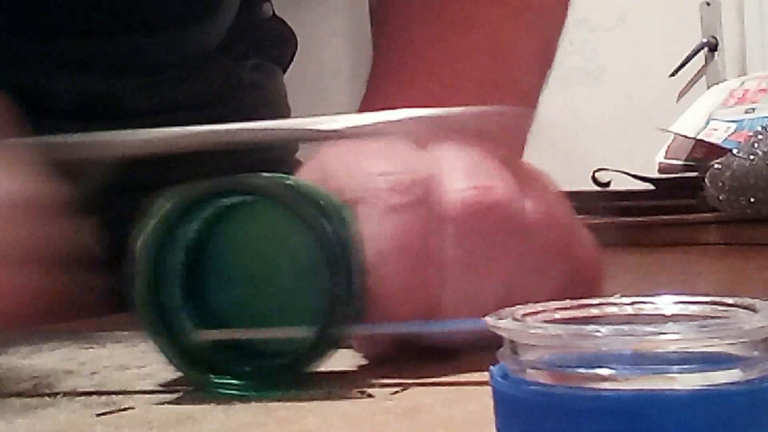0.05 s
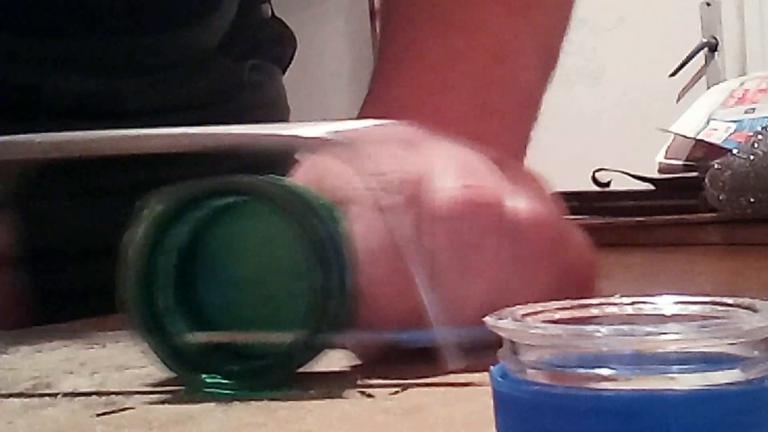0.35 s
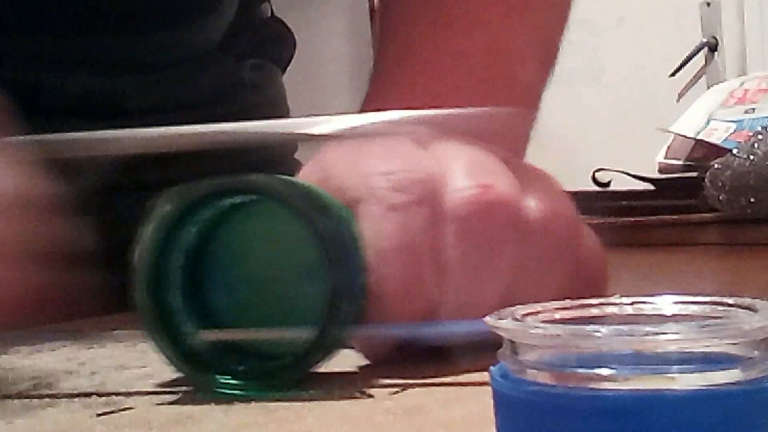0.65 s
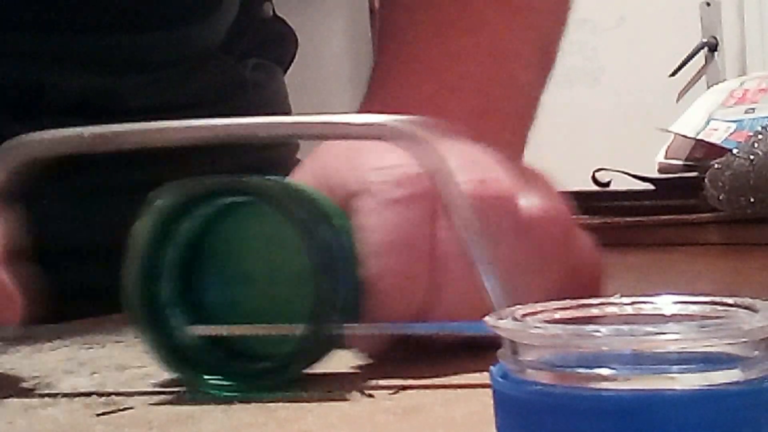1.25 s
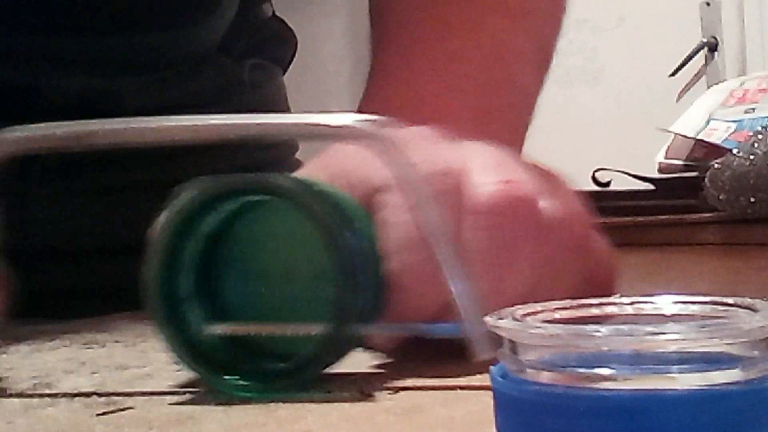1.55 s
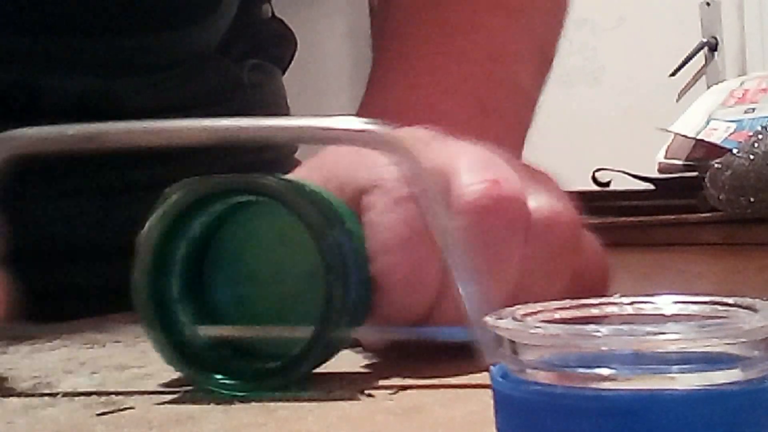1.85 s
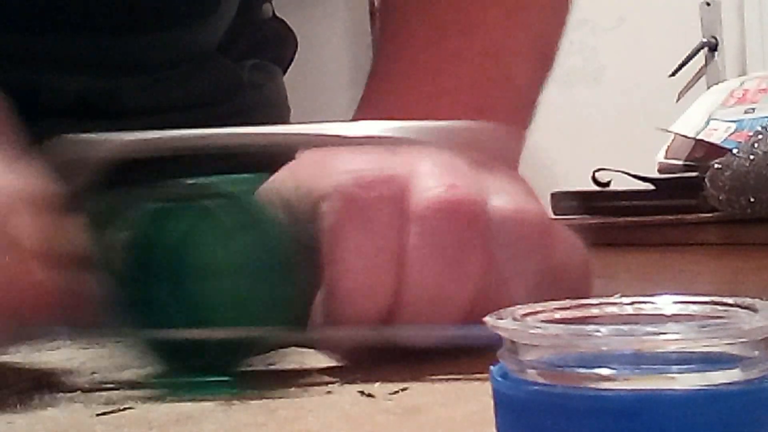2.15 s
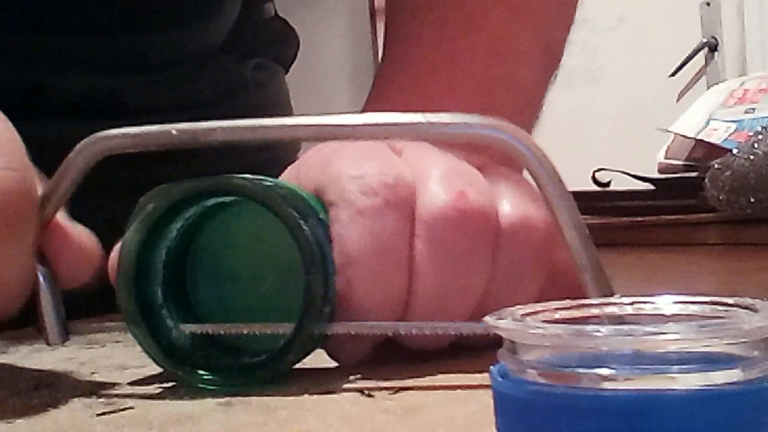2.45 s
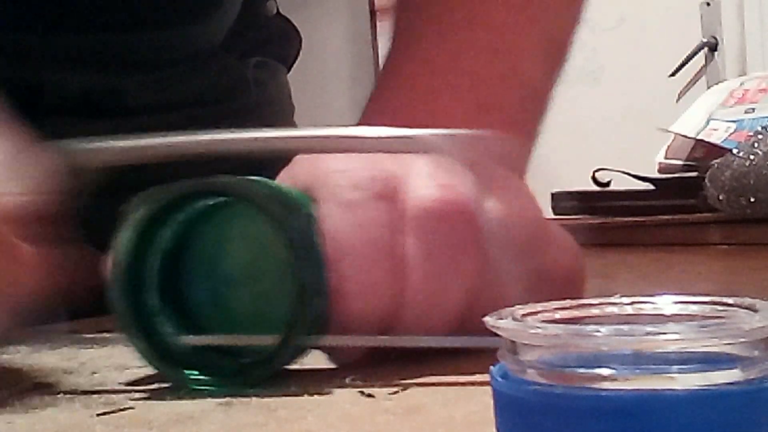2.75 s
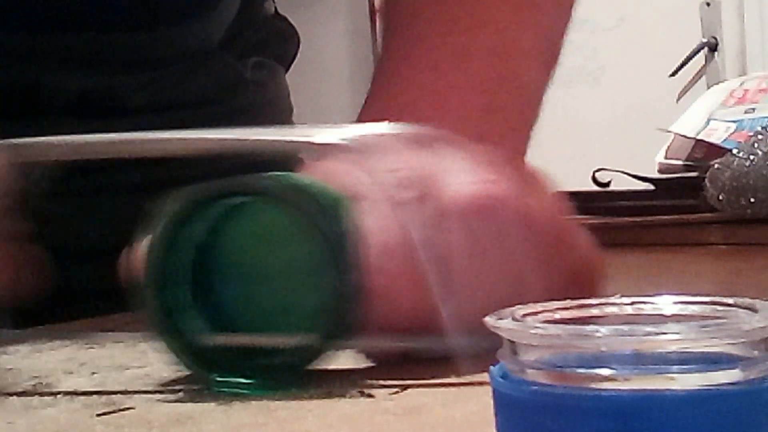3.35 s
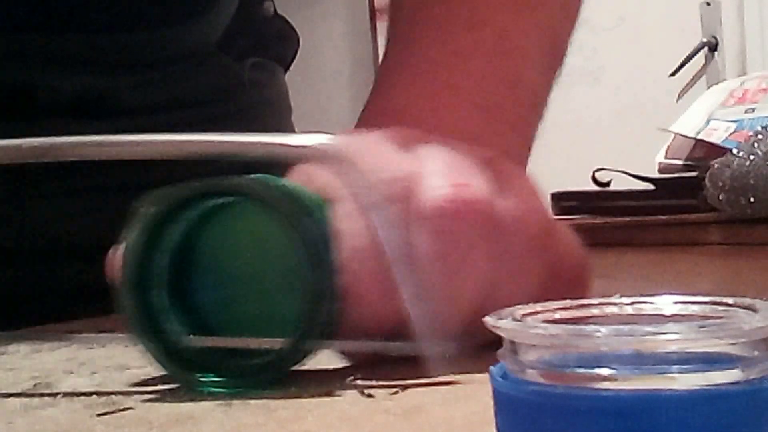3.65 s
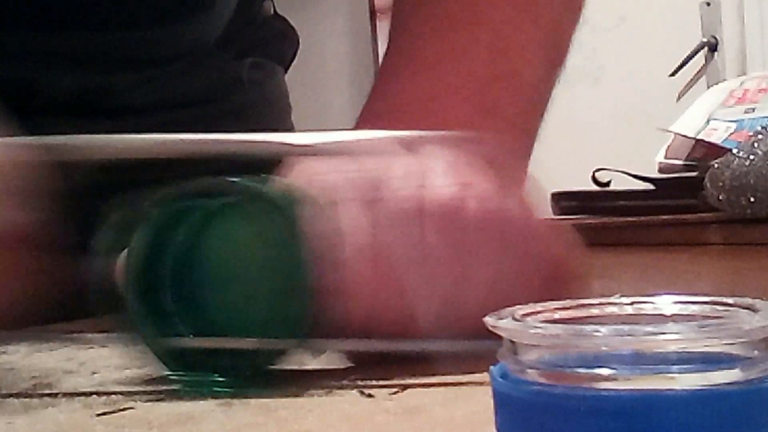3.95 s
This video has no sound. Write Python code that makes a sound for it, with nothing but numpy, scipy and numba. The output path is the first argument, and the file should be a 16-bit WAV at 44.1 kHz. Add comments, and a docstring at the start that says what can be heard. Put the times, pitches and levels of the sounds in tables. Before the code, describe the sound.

Close by in a small room, a hand saw rasps rhythmically through a hollow plastic bottle on a work surface. The blade chatters now and then and the bottle knocks lightly; after a short pause, the sawing resumes.

```python
"""Quick rasping strokes, about three cycles a second, with one pause: a junior hacksaw on a plastic bottle.
Teeth tick across the cut, ringing the thin blade and the hollow bottle and shaking the bench under it.
Now and then the blade binds and chatters, or the bottle knocks on the bench.
A small room adds a short tail and faint steady noise."""
import sys
import numpy as np
from scipy import signal
from scipy.fft import rfft, irfft
from scipy.io import wavfile
from scipy.ndimage import uniform_filter1d
from numba import njit

SR = 44100
rng = np.random.default_rng(int(sys.argv[2]) if len(sys.argv) > 2 else 0)


def log_audio(samples):
    """Write samples as a 16-bit WAV file to the path given in sys.argv[1]."""
    # one column per channel
    frames = np.atleast_2d(samples).T
    # limit to full scale, then quantise
    limited = np.clip(frames, -1, 1)
    pcm = np.round(limited * 32767).astype(np.int16)
    wavfile.write(sys.argv[1], SR, pcm)


N = 176400
TIME_S = np.arange(N) / SR

# Saw strokes. Each row: start and end in seconds, direction (+1 push, -1 pull),
# force on blade, wall, hollow and bench in relative dB, swell over the stroke in dB.
STROKES = [(-.08, 0.027, 1, -54.5, -53, -50, -49, 2), (0.032, 0.138, -1, -47, -44.5, -38.5, -39.5, -5),
           (0.182, 0.281, 1, -43, -44, -41.5, -39.5, -4.5), (0.299, .405, -1, -50, -45.5, -40.5, -41, 7),
           (0.455, 0.55, 1, -44, -45.5, -41, -48, -4), (0.575, 0.676, -1, -50.5, -44.5, -38.5, -40.5, -2.5),
           (0.719, 0.817, 1, -44.5, -46, -42.5, -44, -1), (.847, 0.949, -1, -47, -44.5, -39, -39, -3),
           (1.027, 1.099, 1, -44, -43, -41.5, -37.5, -7), (1.125, 1.220, -1, -52, -45.5, -36.5, -40, -12),
           (1.31, 1.391, 1, -43, -38, -39, -39, 1.5), (1.433, 1.546, -1, -52, -47.5, -40.5, -41.5, -8.5),
           (1.607, 1.69, 1, -41, -39.5, -38, -36.5, 1), (1.734, 1.836, -1, -47, -42.5, -37.5, -36, -6.5),
           (1.909, 1.993, 1, -43.5, -40, -38, -42, -0.5), (2.024, 2.119, -1, -50.5, -45, -37, -38.5, -3.5),
           (2.224, 2.28, 1, -58, -48.5, -40, -36, -13), (2.746, 2.830, 1, -58, -56, -53, -52.5, 15),
           (2.922, 2.985, -1, -52.5, -42.5, -33, -37, 0.5),
           (3.117, 3.193, 1, -46.5, -42.5, -35.5, -35.5, -17),
           (3.26, 3.344, -1, -49, -43, -34.5, -35.5, -1.5), (3.418, 3.502, 1, -42, -41.5, -45, -36, -2),
           (3.540, 3.625, -1, -53, -41, -34, -36.5, 8), (3.694, 3.792, 1, -42, -38, -38, -36.5, -14.5),
           (3.823, 3.906, -1, -47, -40.5, -32, -34.5, -1), (3.98, 4.067, 1, -53, -40, -29, -32, -4)]
# The blade binds. Each row: middle and length in seconds, slip rate in Hz,
# chatter, rasp and crunch in relative dB.
SNAGS = [(0.387, .024, 461, -29.5, -67, -43), (0.884, 0.022, 468, -34, -50, -52),
         (1.06, 0.03, 518.3, -30.5, -41, -57), (1.346, 0.034, 490, -33.5, -39.5, -31.5),
         (1.377, .016, 444, -27, -60, -37), (1.651, .036, 518.7, -26, -50, -51),
         (1.944, 0.023, 536, -31.5, -34, -41), (1.963, .031, 446, -30.5, -42, -41),
         (2.094, 0.062, 261.2, -30.5, -68, -51), (2.270, 0.01637, 248, -27.5, -90, -44),
         (2.965, .036, 249, -23, -58, -53), (3.141, 0.027, 479.6, -28.5, -40.5, -59),
         (3.294, .05, 278.5, -27, -73, -80), (3.457, .015, 507.5, -24, -57, -45),
         (3.582, .055, 430, -27.5, -51, -46), (3.601, .02, 467.8, -37, -62, -37),
         (3.725, 0.028, 525, -31.5, -68, -32.5), (3.86, .029, 309.3, -23.5, -46.5, -38.5),
         (3.883, .026, 292.4, -23, -52.5, -43.5), (3.984, 0.017, 280.6, -24.5, -45.5, -34)]
# Knocks and tooth catches. Each row: start and decay in seconds,
# force on blade, wall, hollow and bench in relative dB.
KNOCKS = [(1.132, 0.0055, -42.5, -48.5, -36, -30), (1.335, 0.0057, -46, -30.5, -35.5, -56),
          (1.440, 0.0047, -54, -54, -38, -29), (1.935, 0.0061, -32, -33.5, -30.5, -55),
          (2.195, 0.0047, -57.5, -60, -41, -38), (2.229, 0.0019, -52, -36, -29.5, -37),
          (2.233, 0.0068, -42, -42, -47, -38), (2.263, 0.0053, -70, -54, -37, -40),
          (2.545, .012, -92, -86, -64.5, -49.5), (2.595, 0.018, -68, -58.5, -45.5, -43),
          (2.873, 0.0042, -84, -71, -66, -38.5), (3.125, 0.0058, -31.5, -38, -49, -48),
          (3.429, 0.0094, -59, -40.5, -32, -55), (3.978, 0.0072, -46, -42, -29, -38)]
# Scuffs in the cut. Each row: middle and length in seconds,
# force on blade, wall, hollow and whine in relative dB.
SCUFFS = [(0.721, 0.011, -66, -58, -47, -53), (1.008, 0.026, -58, -53, -45, -61),
          (1.02, .018, -41.5, -45, -41, -64), (1.214, .014, -56.5, -53, -48, -65),
          (1.303, 0.012, -68, -60, -47, -67), (2.122, 0.011, -60.5, -56, -54, -76),
          (2.811, .016, -69, -52.5, -47.5, -67), (2.916, 0.019, -68, -61, -56, -54),
          (3.085, 0.048, -56, -51, -48, -58.5), (3.105, 0.016, -50.5, -65, -44.5, -67),
          (3.247, .026, -61, -68, -46.5, -55), (3.69, 0.026, -71, -52, -56, -60),
          (3.968, 0.019, -54, -48, -43, -68)]
# Resonances. Each row: centre and width in Hz, gain on the push and on the pull in relative dB.
BLADE_MODES = [(2888, 127, 4.5, 9), (3130, 67, -2, -15.5), (3286, 160, -5, -29), (3795, 660, -8.5, -2.5),
               (4320, 510, -5.5, -0.5), (5330, 385, -1.5, 1.5), (5874, 310, -1.5, 0.5), (6100, 130, 1, 3.5),
               (6440, 590, -9, -7), (10080, 805, .5, 3.5), (10840, 580, 1, 4), (11500, 740, -7, -2),
               (14800, 265, 4, 4.5)]
WALL_MODES = [(840, 63, 1, -4), (920, 293, -4, -5), (1197, 292, -1.5, -1), (1596, 150, -0.5, 2),
              (1862, 246, -10, -7)]
CRUNCH_MODES = [(898, 110, -9.5, 0), (1248, 240, -12, -11.5)]  # bottle wall, as the plastic crunches
WHINE_MODES = [(1567, 116, -7.5, 5.5)]  # bottle wall, as the blade turns
HOLLOW_MODES = [(421.7, 55, 3.5, 1.5), (549, 93.4, 0.5, -1.5), (732, 98, -5.5, -6)]
BENCH_MODES = [(61, 145, -14.5, -11.5), (114, 79.4, -3, -3), (183.6, 25.3, -7, -4), (239, 37.7, -5.5, -1),
               (322.5, 23.3, -3, -5)]
# Blade tone. Each row: time in seconds, lower ring over upper sizzle in dB.
RING_OVER_SIZZLE = [(0, 2), (.7, -4), (1.4, -0.5), (2.1, -0.5), (2.8, 9.5), (3.2, 4), (3.6, 5.5), (4, 2)]
# Force grows as a power of speed. One exponent each for blade, wall, hollow and bench.
FORCE_EXPONENTS = [0.96, 0.89, 0.63, 0.1]
# Room tail. Each row: low and high edge in Hz, T60 in seconds, level in dB.
ROOM_BANDS = [(60.5, 150, 0.31, -9.5), (202, 284, 0.39, -9.5), (284, 820, 0.28, -8.5),
              (780, 1920, 0.35, -14.5), (2010, 4800, 0.32, -12), (3892, 11400, .17, -13),
              (11400, 13000, 0.088, -19.5)]
# Still air of the room. Each row: frequency in Hz, spectral density in relative dB.
AIR_SPECTRUM = [(25, -29.5), (110, -13.5), (250, -12), (420, -2), (750, -31), (1700, -26.5), (5500, -30),
                (8000, -39), (16000, -46)]


def saw():
    """The teeth drive the blade, the bottle's wall and hollow, and the bench."""
    speed, pushed, (on_blade, on_wall, on_hollow, on_bench) = arm()
    clicks, tearing = teeth(speed)
    chatter, rasp, crunch = snags()
    scuff_blade, scuff_wall, scuff_hollow, whine = scuffs()
    thuds, rattles = knocks()
    _, thud_wall, thud_hollow, thud_bench = thuds
    rattle_blade, rattle_wall, rattle_hollow, rattle_bench = rattles

    fine = unit_rms(tearing + .63 * clicks)
    coarse = unit_rms(tearing + .46 * clicks)
    uneven_bite = from_db(1.47 * drift(rate_hz=130))
    wall_grain = even_out(coarse, 800, 1400, hold_s=.011) * uneven_bite
    hollow_grain = even_out(coarse, 470, 614, hold_s=.019) * uneven_bite
    bench_grain = even_out(coarse, 88, 400, hold_s=.035)

    blade_force = tilt(fine * uneven_bite * (on_blade + rasp + scuff_blade + rattle_blade))
    wall_force = wall_grain * (on_wall + scuff_wall + rattle_wall + rasp) + thud_wall
    hollow_force = hollow_grain * (on_hollow + scuff_hollow + rattle_hollow) + thud_hollow
    bench_force = bench_grain * (on_bench + rattle_bench) + thud_bench

    blade = from_db(-2) * butter(resonate(blade_force, BLADE_MODES, pushed), 2250, "high")
    wall = resonate(wall_force, WALL_MODES, pushed)
    wall += resonate(wall_grain * crunch, CRUNCH_MODES, pushed)
    wall -= resonate(wall_grain * whine, WHINE_MODES, pushed)
    hollow = resonate(hollow_force, HOLLOW_MODES, pushed)
    bottle = butter(wall + hollow, 2110, "low", order=3)
    bench = butter(resonate(bench_force, BENCH_MODES, pushed), 606.42, "low")
    return blade + bottle - bench + chatter


def arm(attack_s=.026, release_s=.036, coast_s=.01, drag_db=-19, drag_s=.05):
    """Each stroke speeds up, holds and stops; the blade drags lightly around it."""
    speed, pushed, force = np.zeros(N), np.ones(N, bool), np.zeros((4, N))
    for start_s, end_s, direction, *levels_db, swell_db in STROKES:
        on = (TIME_S > start_s) & (TIME_S < end_s)
        t = TIME_S[on]
        progress = (t - start_s) / (end_s - start_s)
        rise = np.sin(np.pi / 2 * np.minimum((t - start_s) / attack_s, 1))
        fall = np.sin(np.pi / 2 * np.minimum((end_s - t) / release_s, 1))
        speed[on] = rise * fall
        pushed[TIME_S > start_s] = direction > 0
        swell = from_db(swell_db * (progress - .5))
        force[:, on] = from_db(levels_db)[:, None] * speed[on] ** np.array(FORCE_EXPONENTS)[:, None]
        force[:, on] *= swell
        force[0, on] *= (np.pi / 2 * np.sin(np.pi * progress)) ** .15  # blade force arches slightly
    force[0] += from_db(drag_db) * uniform_filter1d(force[0], int(drag_s * SR) + 1)
    return speed, pushed, uniform_filter1d(force, int(coast_s * SR) + 1)


def teeth(speed, full_speed_hz=750, jitter=.3, spread_db=1.24, fade_per_tooth=1.2):
    """Each tooth catches with a click and tears a short, fading chip."""
    rate_hz = full_speed_hz * (1 + speed) / 2 * np.exp(jitter * drift(rate_hz=500))
    travel = np.cumsum(rate_hz) / SR
    tooth = travel.astype(int)
    bite = from_db(spread_db * np.clip(rng.standard_normal(N), -2, 2))[tooth]
    clicks = bite * np.diff(tooth, prepend=0)
    tearing = bite * np.exp(-fade_per_tooth * (travel % 1)) * rng.standard_normal(N)
    return unit_rms(clicks - clicks.mean()), unit_rms(tearing)


def snags(jitter=.144, sag=.21, overtone=.14):
    """Stick-slip at a sagging, unsteady rate: chatter tone, plus rasp and crunch envelopes."""
    chatter, rasp, crunch = np.zeros((3, N))
    unsteady = np.exp(jitter * drift(rate_hz=300))
    for middle_s, length_s, slip_hz, chatter_db, rasp_db, crunch_db in SNAGS:
        on = abs(TIME_S - middle_s) < length_s / 2
        grip = arch(middle_s, length_s)[on]
        rate_hz = slip_hz * unsteady[on] * np.exp(-sag * (TIME_S[on] - middle_s) / length_s)
        phase = 2 * np.pi * np.cumsum(rate_hz) / SR
        chatter[on] += from_db(chatter_db) * grip * (np.sin(phase) + overtone * np.sin(2 * phase))
        rasp[on] += from_db(rasp_db) * grip
        crunch[on] += from_db(crunch_db) * grip
    return chatter, rasp, crunch


def knocks(thud_db=19.5):
    """The bottle hits the bench or a tooth catches: one impulse and a dying rattle envelope."""
    thuds, rattles = np.zeros((2, 4, N))
    for start_s, decay_s, *levels_db in KNOCKS:
        on = (TIME_S >= start_s) & (TIME_S < start_s + .1)
        rattles[:, on] += from_db(levels_db)[:, None] * np.exp(-(TIME_S[on] - start_s) / decay_s)
        thuds[:, int(start_s * SR)] = from_db(levels_db) * from_db(thud_db)
    return thuds, rattles


def scuffs():
    """Brief, light forces as the blade turns or reseats in the cut."""
    return sum(from_db(levels_db)[:, None] * arch(middle_s, length_s)
               for middle_s, length_s, *levels_db in SCUFFS)


def even_out(friction, low_hz, high_hz, hold_s):
    """Level the friction's chance swells in one band."""
    band = butter(butter(friction, low_hz, "high"), high_hz, "low")
    power = uniform_filter1d(unit_rms(band) ** 2, int(hold_s * SR))
    return friction / np.sqrt(power + .019)


def tilt(force, split_hz=4600):
    """Shift the blade force between lower ring and upper sizzle."""
    gain = from_db(np.interp(TIME_S, *np.transpose(RING_OVER_SIZZLE)) / 2)
    lower = butter(force, split_hz, "low", order=1)
    return lower * gain + (force - lower) / gain


def resonate(force, modes, pushed, wander_db=2, bend_share=.018):
    """Parallel modes, power-normalised, bent by flexing, weighted by direction and wandering contact."""
    ringing, power = 0, 0
    for k, (hz, width_hz, push_db, pull_db) in enumerate(modes):
        radius = np.exp(-np.pi * abs(width_hz) / SR)
        gain = from_db(np.where(pushed, push_db, pull_db) + wander_db * drift(rate_hz=20))
        centre_hz = hz + min(bend_share * hz, width_hz / 2) * drift(rate_hz=11)
        ringing += (-1) ** k * ring(force * gain + 1e-18, 2 * np.pi * centre_hz / SR, radius)
        power += from_db((push_db + pull_db) / 2) ** 2 * (1 - radius ** 2) / 2
    return ringing / np.sqrt(power)


@njit
def ring(force, angle_rad, radius):
    """Two-pole resonance with a moving centre."""
    y = np.zeros(len(force))
    for i in range(2, len(force)):
        drive = (1 - radius ** 2) / 2 * (force[i] - force[i - 2])
        y[i] = drive + 2 * radius * np.cos(angle_rad[i]) * y[i - 1] - radius ** 2 * y[i - 2]
    return y


def room(sound, delay_s=.0016, build_s=.0052):
    """Short diffuse tail: upper bass hangs longest, treble dies first."""
    t = TIME_S[:SR // 2]
    build = np.clip((t - delay_s) / build_s, 0, 1)
    tail = 0
    for low_hz, high_hz, t60_s, level_db in ROOM_BANDS:
        echoes = rng.standard_normal(len(t)) * build * np.exp(-np.log(1000) * t / t60_s)
        band = butter(butter(echoes, low_hz, "high", order=4), high_hz, "low", order=4)
        tail += from_db(level_db) * np.sqrt(2 * (high_hz - low_hz) / SR) * band / np.linalg.norm(band)
    return signal.fftconvolve(sound, tail)[:N]


def air(level_db=-73):
    """Faint steady room noise."""
    hz, density_db = np.transpose(AIR_SPECTRUM)
    bins_hz = np.arange(N // 2 + 1) * SR / N
    colour = from_db(np.interp(np.log(bins_hz + 1), np.log(hz), density_db))
    return from_db(level_db) * unit_rms(irfft(rfft(rng.standard_normal(N)) * colour, N))


def from_db(db):
    """Decibels to gain."""
    return 10 ** (np.asarray(db) / 20)


def unit_rms(x):
    """Scale to unit power."""
    return x / np.sqrt(np.mean(x ** 2) + 1e-20)


def butter(x, hz, kind, order=2):
    """Low- or high-pass."""
    return signal.sosfilt(signal.butter(order, hz, kind, fs=SR, output="sos"), x + 1e-18)


def drift(rate_hz):
    """Unit normal draws joined by straight lines."""
    return np.interp(TIME_S * rate_hz, np.arange(N // 10), rng.standard_normal(N // 10))


def arch(middle_s, length_s):
    """Half-cosine rise and fall."""
    return np.cos(np.pi * np.clip((TIME_S - middle_s) / length_s, -.5, .5))


def scene():
    """The saw in its room, mono."""
    sawing = saw()
    return (sawing + room(sawing) + air())[None]


def record(dry, cutoff_hz=15800):
    """Steep low-pass."""
    return signal.sosfilt(signal.ellip(10, .2, 70, cutoff_hz, fs=SR, output="sos"), dry)


dry = scene()
out = record(dry)
log_audio(out)
```